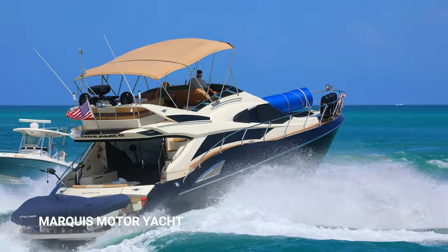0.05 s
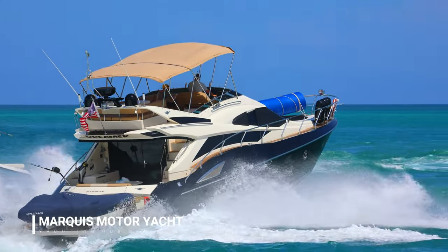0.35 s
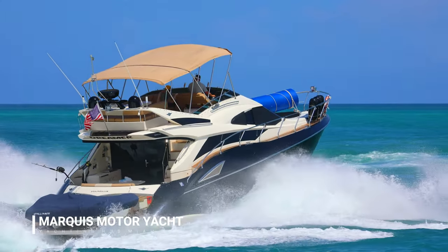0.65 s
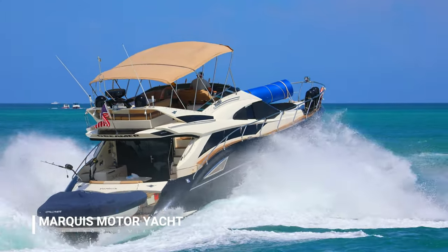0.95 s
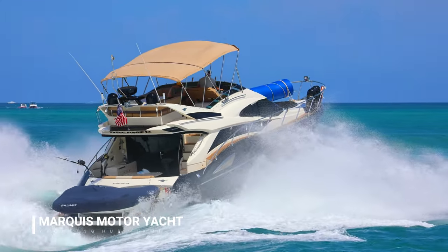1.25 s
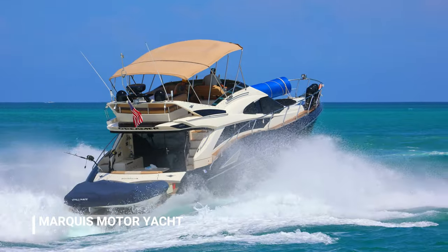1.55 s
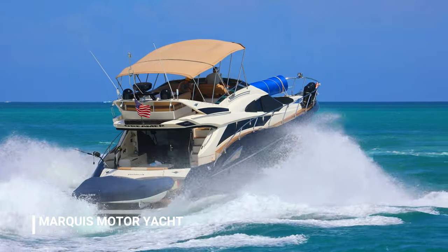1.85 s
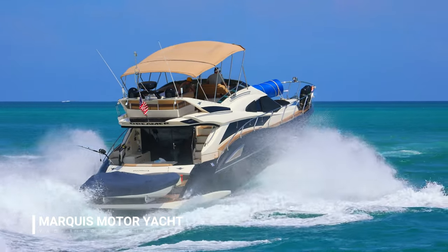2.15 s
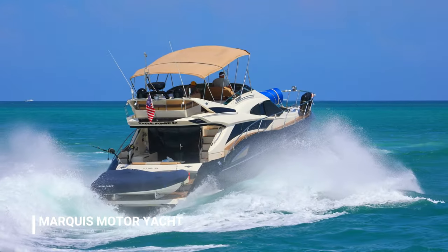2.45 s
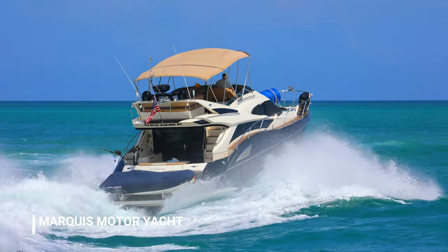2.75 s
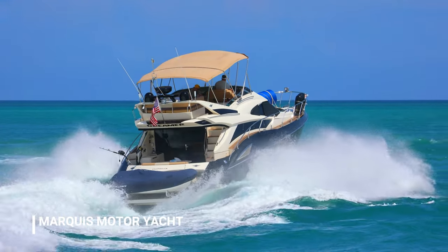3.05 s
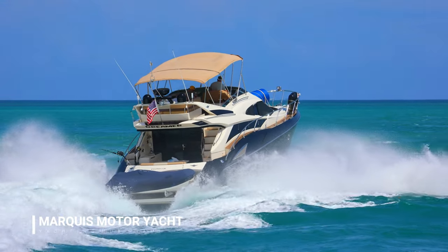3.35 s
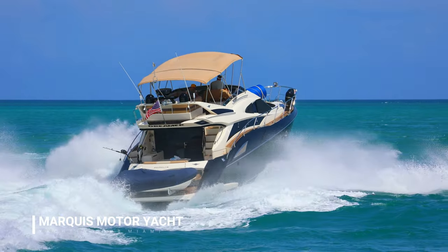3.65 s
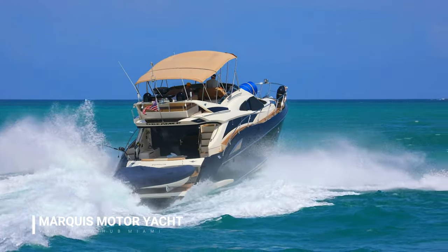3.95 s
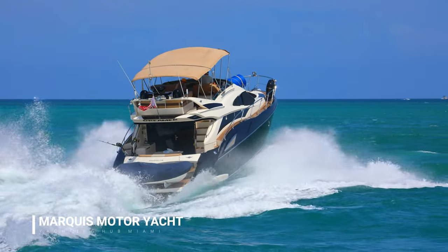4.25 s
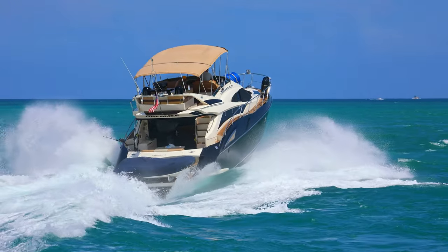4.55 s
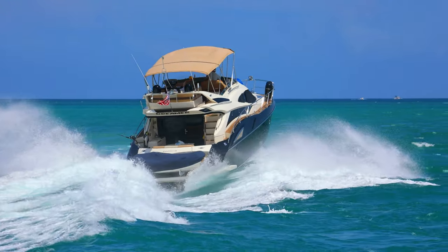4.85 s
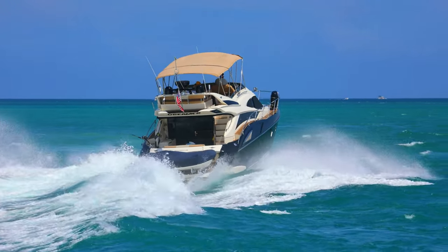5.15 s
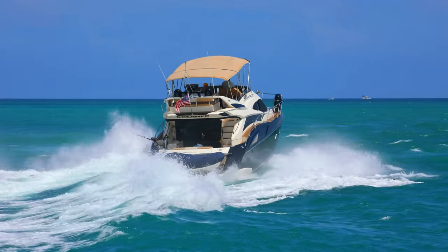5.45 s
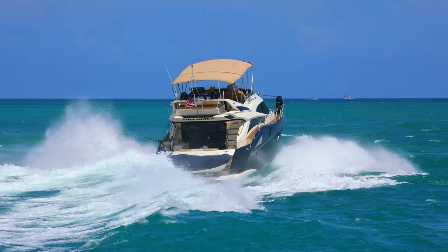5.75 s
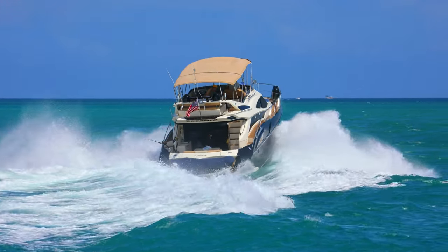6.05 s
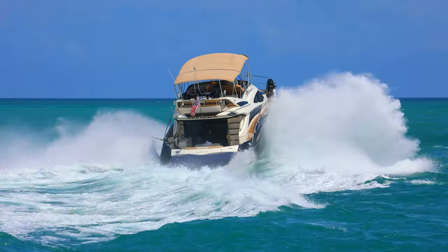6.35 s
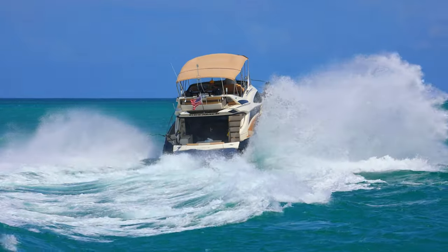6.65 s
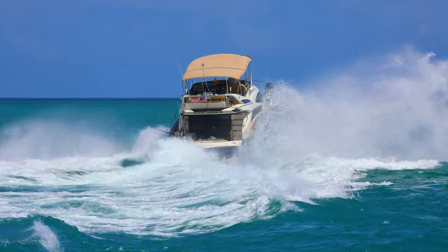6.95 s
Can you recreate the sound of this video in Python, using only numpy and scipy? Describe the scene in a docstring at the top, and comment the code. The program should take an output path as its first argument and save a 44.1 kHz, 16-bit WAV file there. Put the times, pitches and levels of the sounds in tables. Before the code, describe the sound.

Out on open water, a continuous rush of foam and spray surges again and again as a powerboat pounds through waves. Its low engine drone and burbling exhaust rumble sit beneath the water, along with dull hull thumps and an occasional light tick of droplets. Gusts flutter and thump on the microphone. The engines recede toward the end, while the churning wake and hissing spray stay strong.

```python
"""Motor yacht in the surf.

The bow throws sheets of spray over a roaring wash, waves pound the hull, and bubbles churn astern.
Two diesels drone and their drowned exhausts boom, fading as the boat draws away.
Wind buffets the microphone, and a few near drops tick through the hiss."""
import sys
import numpy as np
from scipy import signal
from scipy.fft import rfft, irfft, next_fast_len
from scipy.io import wavfile
from scipy.ndimage import uniform_filter1d, map_coordinates

SR = 44100
rng = np.random.default_rng(int(sys.argv[2]) if len(sys.argv) > 2 else 0)


def wrap_up_sound(samples):
    """Save the sound to the file named by the first command line argument, as 16-bit audio."""
    columns = np.atleast_2d(samples).T
    # keep every value between -1 and 1, then stretch to whole-number steps
    tamed = np.clip(columns, -1, 1)
    steps = np.round(tamed * 32767).astype(np.int16)
    wavfile.write(sys.argv[1], SR, steps)


N = 317079
T = np.arange(N) / SR
TOP_HZ = 15750


# time_s, wash_db, spray_db, mist_db
SURF_LEVELS = [(0, -30.5, -43, -56), (.8, -30.5, -43.5, -57), (1.5, -30, -42.5, -56),
               (3.3, -31, -44.5, -56), (4.45, -32.5, -45.5, -56.5), (5.2, -31, -44, -57),
               (6.5, -30.5, -44.5, -56), (7.2, -28, -44, -53)]
# freq_hz, gain_db
WASH_SPECTRUM = [(350, -16), (650, -7), (820, -3), (980, -1.5), (1120, -5.5), (1320, -11.5), (1650, -11),
                 (2100, -13.5), (2800, -20), (4000, -24.5), (9000, -70)]

def bow_wash():
    """Small bubbles roar in the breaking bow wave, louder with each sheet of water."""
    level_db = curves(SURF_LEVELS)[0] + sheets_db()
    water = rush(patchy_db=0)
    water += 0.2 * bubbles(1502, spread=0.2874, cycles=11.3, scatter_db=1, count=5000, samples=600)
    return amp(level_db) * coloured(water, WASH_SPECTRUM)


# peak_s, rise_db, attack_s, decay_s
BOW_SHEETS = [(.22, 2.5, .12, 0.09), (1.03, 0.5, .1, .25), (1.76, 3, 0.091, 0.12), (2.09, 4, 0.15, 0.28),
              (2.97, 1.3, .12, .12), (3.58, 1.1, 0.25, .25), (3.9, 1.5, 0.21, 0.29),
              (4.78, 3.5, 0.29, 0.21), (5.22, 1.5, 0.23, 0.12), (5.8, 2.8, .2, 0.31),
              (6.03, 2.1, .14, 0.34), (6.76, 1.8, 0.29, .2)]

def sheets_db():
    """Level rise as the bow throws up sheets of water that fall back."""
    return sum(db * swell(peak_s, attack_s, decay_s) for peak_s, db, attack_s, decay_s in BOW_SHEETS)


# freq_hz, gain_db
SPRAY_SPECTRUM = [(1200, -13), (2400, 0.5), (3000, -2), (3400, 2.5), (3950, -4.5), (4900, -0.5), (5600, -4),
                  (6500, -9.5), (7500, -15), (10100, -19.5), (15900, -41)]
MIST_SPECTRUM = [(4100, -7), (7400, -1.5), (9900, -1), (12100, -2), (14100, -4), (15900, -7)]

def spray():
    """Sheets of drops patter back on the sea under a hiss of fine mist."""
    _, spray_db, mist_db = curves(SURF_LEVELS)
    patter = rush(patchy_db=1.13)
    patter += 0.32 * bubbles(4500, spread=0.3, cycles=3.2, scatter_db=3, count=6000, samples=140)
    mist = rush(patchy_db=0)
    mist += 0.39 * bubbles(9800, spread=0.17, cycles=4.5, scatter_db=3.5, count=6000, samples=60)
    surge_db = sheets_db() + 0.48 * wobble(20)
    return (amp(spray_db + 1 + 0.95 * surge_db) * coloured(patter, SPRAY_SPECTRUM)
            + amp(mist_db + 1.3 * surge_db) * coloured(mist, MIST_SPECTRUM))


# time_s, level_db
WAKE_LEVEL = [(0, -28.5), (.8, -29.5), (2, -30), (3.4, -31.5), (4.08, -29.5), (4.5, -32.5), (5.5, -32.5),
              (6.45, -31.5), (7.2, -29.5)]
# freq_hz, gain_db
WAKE_SPECTRUM = [(150, -53), (330, -0.5), (420, -1), (530, 1.5), (620, -2.5), (760, -0.5), (1200, 2),
                 (4000, -51)]

def wake():
    """Large bubbles churn behind the stern, swelling with each pound and sheet."""
    level_db = curves(WAKE_LEVEL)[0] + 0.27 * pounds_db() + 0.58 * sheets_db()
    churn = rush(patchy_db=0.7)
    churn += 0.47 * bubbles(485, spread=0.192, cycles=15.6, scatter_db=0, count=2200, samples=1400)
    return amp(level_db - 1.5) * coloured(churn, WAKE_SPECTRUM)


# time_s, level_db
CHOP_LEVEL = [(0, -25.5), (1.5, -26.5), (2.7, -26.5), (3.3, -28), (3.8, -26.5), (4.5, -30.5), (5, -26),
              (6.5, -27.5), (7.2, -26)]
# freq_hz, gain_db
HULL_SPECTRUM = [(50, -42), (115, -0.5), (160, -3), (220, -6), (275, -6), (350, -13.5), (600, -34),
                 (2000, -120)]

def hull():
    """Chop drums on the broad hull panels, harder each time the boat pounds."""
    level_db = curves(CHOP_LEVEL)[0] + pounds_db()
    drumming = coloured(rng.standard_normal(N), HULL_SPECTRUM)
    return amp(level_db + 0.07) * steadied(drumming, evenness=0.47)


# peak_s, rise_db
HULL_POUNDS = [(.22, 7.5), (.63, 4), (1.07, 4.5), (1.77, 3), (2.15, 3), (2.81, 4), (2.94, 3), (3.52, 1.5),
               (3.94, 4.5), (5.09, 2), (5.33, 0), (6.05, 3), (6.93, 3)]

def pounds_db():
    """Level rise as the hull meets one wave after another."""
    return sum(db * swell(peak_s, attack_s=0.044, decay_s=0.12) for peak_s, db in HULL_POUNDS)


# time_s, crank_hz, level_db
ENGINE_RUN = [(0, 30.7, -34), (1, 30.3, -30), (1.6, 27.7, -30.5), (2.6, 29, -31), (3.2, 29.7, -35),
              (5, 29.3, -34.5), (7.2, 36.4, -46)]
# crank_order, gain_db
EXHAUST_TONES = [(4.05, -2.5), (4.55, -1), (6, 2), (15, -15), (17.2, -17), (18.1, -10.5)]

def diesels():
    """Two shafts at nearly the same speed beat; water over the exhausts makes them burble."""
    crank_hz, level_db = curves(ENGINE_RUN)
    drone = np.zeros(N)
    for detune in (-0.004, 0.004):
        turns = np.cumsum(crank_hz * (1 + detune + 0.008 * wobble(8))) / SR
        for order, gain_db in EXHAUST_TONES:
            burble_db = 1.85 * wobble(12)
            drone += amp(gain_db + burble_db) * np.sin(2 * np.pi * (order * turns + rng.random()))
    return amp(level_db + 2) * unit(drone)


# time_s, level_db
RUMBLE_LEVEL = [(0, -28), (.7, -25), (2.5, -25), (5.8, -25), (7.2, -30.5)]
# start_s, length_s, rise_db
EXHAUST_BOOMS = [(.22, .44, 7.5), (1.05, .33, 3), (1.6, .48, 2), (2.25, 0.35, 5.5), (2.9, .31, 5.5),
                 (3.39, .22, 2.5), (3.92, .2, 5), (4.19, 0.33, 4.5), (4.8, 0.13, 4.5), (5.06, .56, 6),
                 (6.7, 0.074, 5.5)]
# freq_hz, gain_db
PIPE_RESONANCE = [(35, -36), (58, -4), (70, 4), (88, 4.5), (110, -2.5), (130, -10), (250, -53), (800, -120)]

def exhaust_rumble():
    """Gas leaves the drowned pipes in uneven gulps; they boom while the stern lifts them clear."""
    when, size = rng.random((1500, 2)).T
    gulps = np.bincount((when * N).astype(int), size - 0.5, N)
    level_db = curves(RUMBLE_LEVEL)[0] + held_db(EXHAUST_BOOMS, edge_s=0.035) + 1.4 * wobble(14)
    return amp(level_db - 0.7) * steadied(coloured(gulps, PIPE_RESONANCE), evenness=0.94)


# time_s, level_db
BREEZE_LEVEL = [(0, -32), (.3, -24), (1.4, -25), (2.5, -25), (4.5, -24), (5.7, -26.5), (7.2, -25.5)]
# start_s, length_s, rise_db
WIND_GUSTS = [(.22, 0.4, 3), (1.79, 0.12, 8.5), (2.7, 0.21, 5.5), (2.98, 0.42, 1.5), (3.69, .38, 4.5),
              (4.14, 0.12, 8), (6.05, 0.39, 5.5)]
# freq_hz, gain_db
BUFFET_SPECTRUM = [(8, -33), (22, -5.5), (42, -2.5), (60, 2), (72, -14), (100, -17.5), (300, -51),
                   (900, -120)]
# centre_s, level_db, pitch_hz
WIND_EDDIES = [(0.467, -15, 45.7), (1.432, -11.5, 69.4), (1.873, -11, 55), (3.577, -10, 66.3),
               (3.95, -7, 60.5), (4.355, -10.5, 74), (4.841, -9, 75), (5.11, -7.5, 80), (6.091, -7.5, 60)]

def wind():
    """Gusts buffet the microphone over a fluttering breeze, and single eddies thump it."""
    level_db = curves(BREEZE_LEVEL)[0] + held_db(WIND_GUSTS, edge_s=0.051) + 1.2 * wobble(14)
    buffet = amp(level_db) * steadied(coloured(rng.standard_normal(N), BUFFET_SPECTRUM), evenness=1)
    for centre_s, eddy_db, pitch_hz in WIND_EDDIES:
        offset = np.pi * pitch_hz * (T - centre_s)
        buffet *= 1 - 0.5 * np.exp(-offset ** 2 / 4)  # the eddy displaces the flow
        thump = (2 * offset ** 2 - 1) * np.exp(-offset ** 2)  # suction in the core, a push either side
        buffet += amp(eddy_db + 2.5) * thump
    return buffet


# start_s, level_db
HULL_SLAPS = [(0.202, -19), (.318, -23), (1.74, -18), (2.077, -18), (2.56, -19)]

def slaps():
    """Water smacks the side of the hull in dull bursts."""
    pitch_hz, t60_s = 990, 0.055
    return bursts([(start_s, db, pitch_hz, t60_s) for start_s, db in HULL_SLAPS], half_width_oct=0.4)


# start_s, level_db, pitch_hz, t60_s
NEAR_DROPS = [(.394, -31, 5300, .015), (.602, -25, 4530, 0.027), (1.262, -30, 4500, .01),
              (2.032, -30, 3200, .012), (3.585, -29, 5700, .022), (6.133, -24, 2850, 0.01),
              (6.795, -35, 8980, .012)]

def drops():
    """Each near drop lands with a short tick of narrow noise."""
    return amp(-1.5) * bursts(NEAR_DROPS, half_width_oct=0.25)


# freq_hz, gain_db
HISS_SPECTRUM = [(30, -6), (130, -17.5), (260, -11), (500, 3.5), (1000, 3.5), (2200, 7), (3400, 2),
                 (4800, -2.5), (6000, -4), (9000, -2), (10200, -5), (11500, -25)]

def side_hiss():
    """Faint, steady hiss that differs between the two channels."""
    return amp(-55.5) * coloured(rng.standard_normal(N), HISS_SPECTRUM)


def bubbles(centre_hz, spread, cycles, scatter_db, count, samples):
    """Pings that fall 60 dB in `cycles` and rise in pitch as each bubble nears the surface; rms 1."""
    when, pitch, strength = rng.random((count, 3)).T
    pitch_hz = np.clip(centre_hz * (pitch / (1 - pitch)) ** spread, 100, TOP_HZ)
    turns = pitch_hz[:, None] * np.arange(samples) / SR
    age = turns / cycles
    envelope = amp(-60 * age) * (1 - np.exp(-2 * turns))
    pings = envelope * np.sin(2 * np.pi * turns * (1 + age / 10))
    gain = amp(scatter_db * np.minimum(-np.log(1 - strength), 5))
    index = (when * N).astype(int)[:, None] + np.arange(samples)
    return unit(np.bincount(index.ravel(), (gain[:, None] * pings).ravel(), N)[:N])


def rush(patchy_db):
    """Noise whose gain drifts in patches of time and frequency; rms 1."""
    spectra = signal.stft(rng.standard_normal(N), nperseg=512)[2]
    patches = uniform_filter1d(rng.standard_normal(spectra.shape), size=7, axis=0)
    patches = unit(uniform_filter1d(patches, size=12, axis=1))
    return unit(signal.istft(spectra * amp(patchy_db * patches), nperseg=512)[1][:N])


def bursts(rows, half_width_oct):
    """One decaying burst of band noise per row."""
    out, t = np.zeros(N), T[:SR // 10]
    for start_s, level_db, pitch_hz, t60_s in rows:
        edges_hz = [pitch_hz / 2 ** half_width_oct, min(pitch_hz * 2 ** half_width_oct, TOP_HZ)]
        band = signal.butter(2, edges_hz, "bandpass", fs=SR, output="sos")
        burst = signal.sosfilt(band, rng.standard_normal(len(t)) * amp(-60 * t / t60_s))
        out[round(start_s * SR):][:len(t)] += amp(level_db) * burst / np.abs(burst).max()
    return out


def steadied(x, evenness):
    """Even out the power over about 0.1 s, from not at all (0) to fully (1); rms 1."""
    power = np.abs(uniform_filter1d(uniform_filter1d(x ** 2, size=3000), size=1500)) + 1e-6
    return unit(x / power ** (evenness / 2))


def held_db(rows, edge_s):
    """Level rises that ramp up, hold and ramp down."""
    return sum(rise_db * np.clip(np.minimum(T - start_s, start_s + length_s - T) / edge_s + 0.5, 0, 1)
               for start_s, length_s, rise_db in rows)


def swell(peak_s, attack_s, decay_s):
    """Linear rise to 1, then exponential fall."""
    return np.clip(1 + (T - peak_s) / attack_s, 0, 1) * np.exp(-np.maximum(T - peak_s, 0) / decay_s)


def wobble(rate_hz):
    """Smooth random curve with knots at rate_hz."""
    return map_coordinates(rng.standard_normal(int(N * rate_hz / SR) + 4), [T * rate_hz])


def curves(rows):
    """One value per sample for each column after time_s."""
    time_s, *columns = np.transpose(rows)
    return [np.interp(T, time_s, column) for column in columns]


def coloured(x, spectrum):
    """Shape x by freq_hz, gain_db points; rms 1."""
    freq_hz, gain_db = np.transpose(spectrum)
    return unit(filtered(x, lambda hz: amp(np.interp(np.log(hz + 1), np.log(freq_hz), gain_db))))


def filtered(x, response):
    """Apply the gain response(hz) by FFT."""
    size = next_fast_len(N + SR // 2)
    return irfft(rfft(x, size) * response(np.fft.rfftfreq(size, 1 / SR)), size)[..., :N]


def amp(db):
    """Decibels to gain."""
    return 10 ** (np.asarray(db) / 20)


def unit(x):
    """Scale to rms 1."""
    return x / np.sqrt(np.mean(x ** 2) + 1e-20)


def scene():
    """One microphone feeds both channels; only a faint hiss differs between them."""
    mid = wind() + diesels() + exhaust_rumble() + hull()
    mid += wake() + bow_wash() + spray() + slaps() + drops()
    side = side_hiss()
    return np.array([mid + side, mid - side])


def record(dry):
    """Brick-wall low-pass at TOP_HZ."""
    return filtered(dry, lambda hz: hz < TOP_HZ)


dry = scene()
out = record(dry)
wrap_up_sound(out)
```